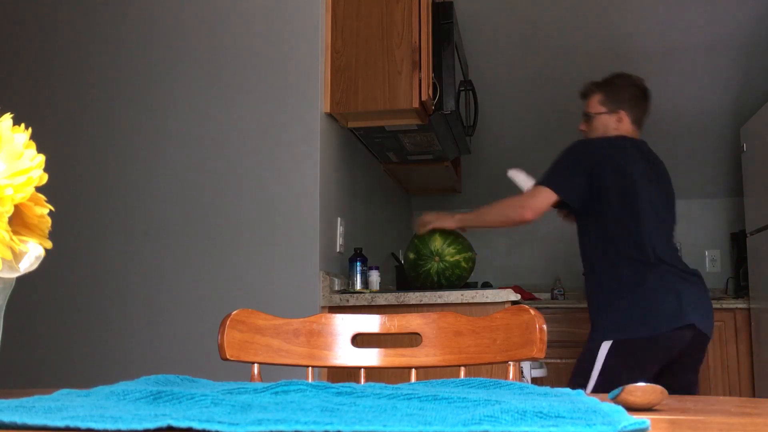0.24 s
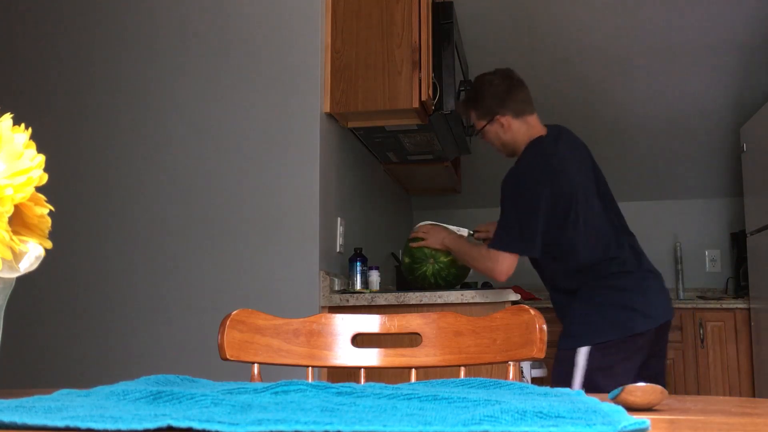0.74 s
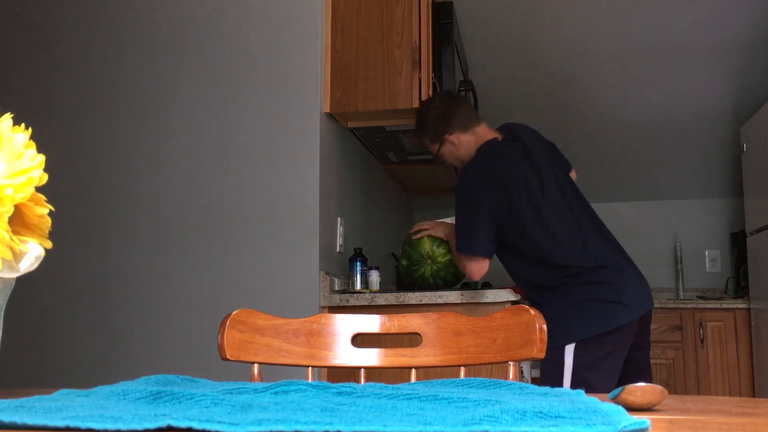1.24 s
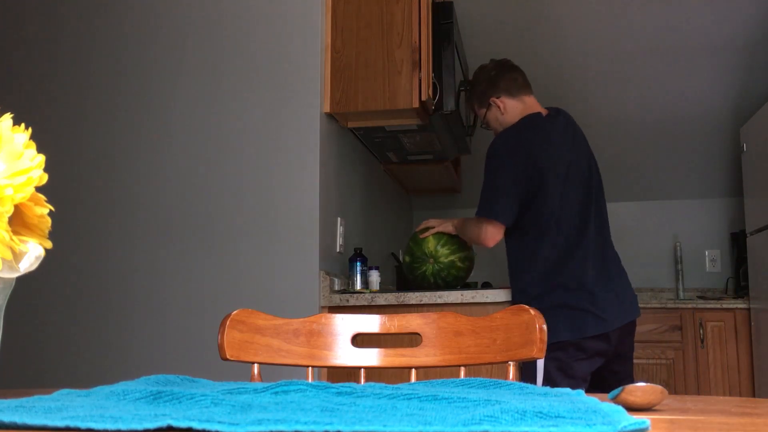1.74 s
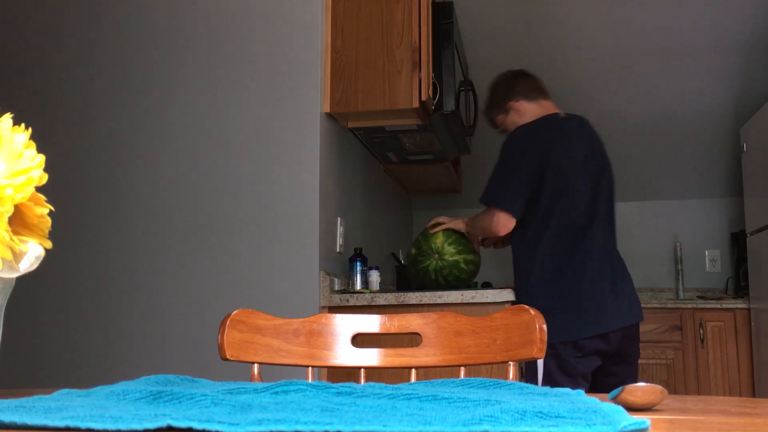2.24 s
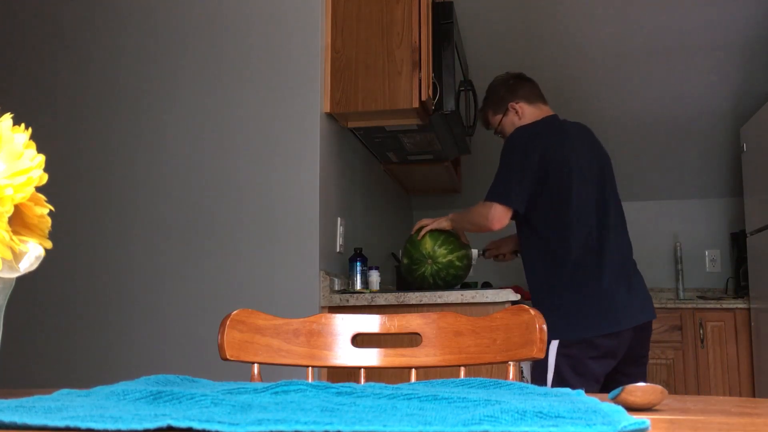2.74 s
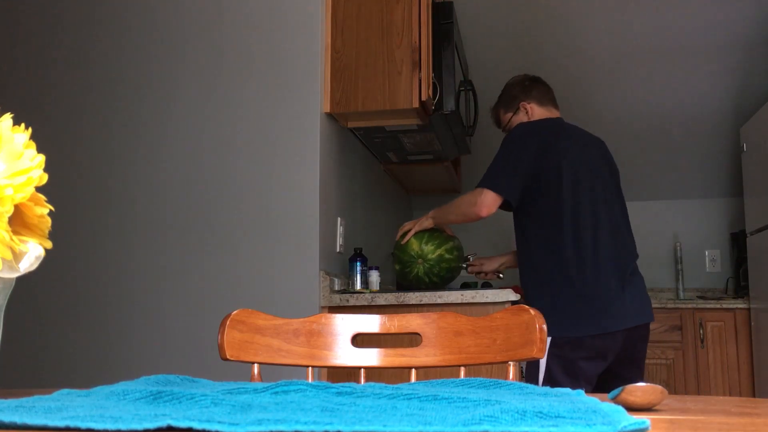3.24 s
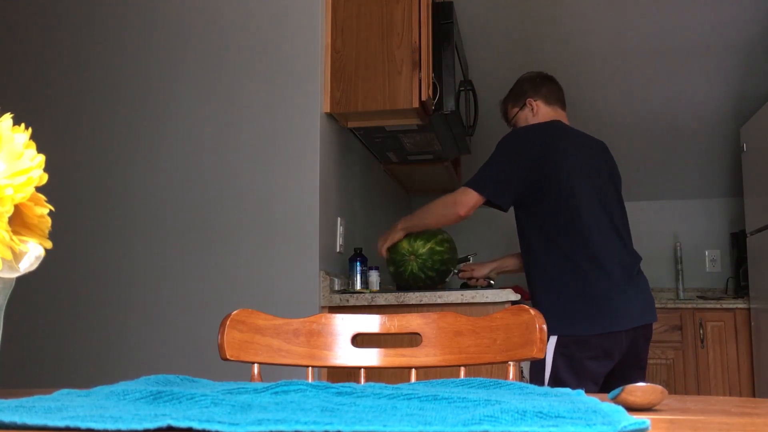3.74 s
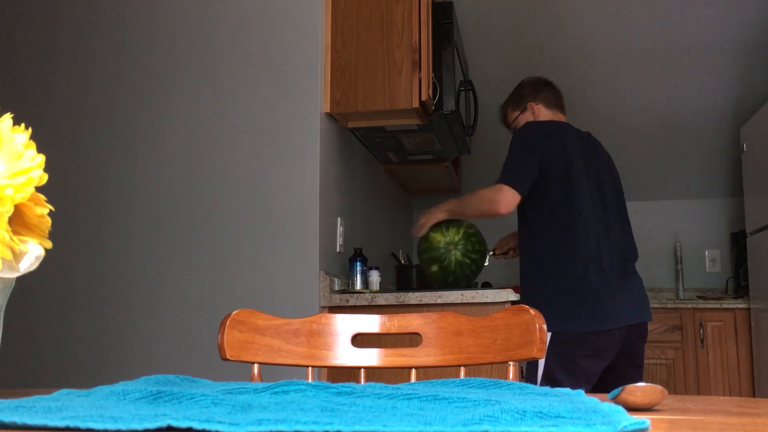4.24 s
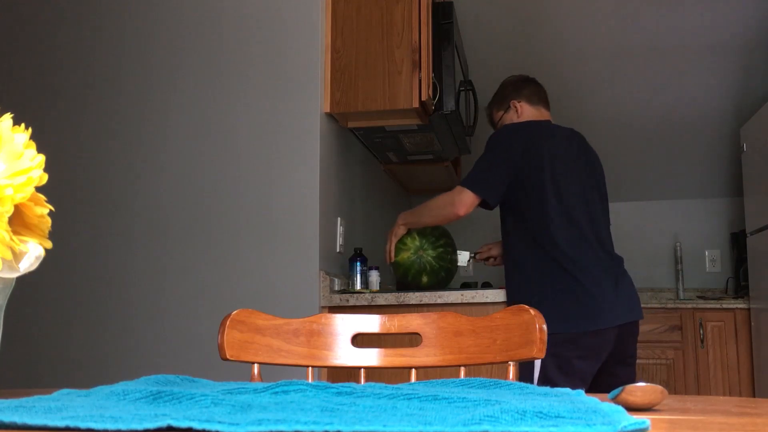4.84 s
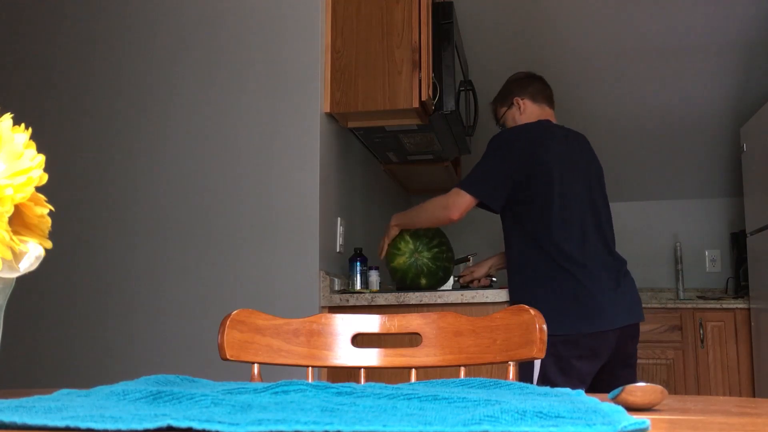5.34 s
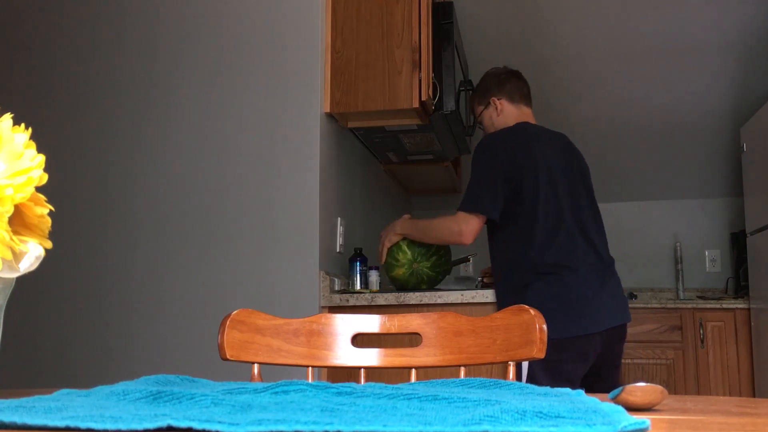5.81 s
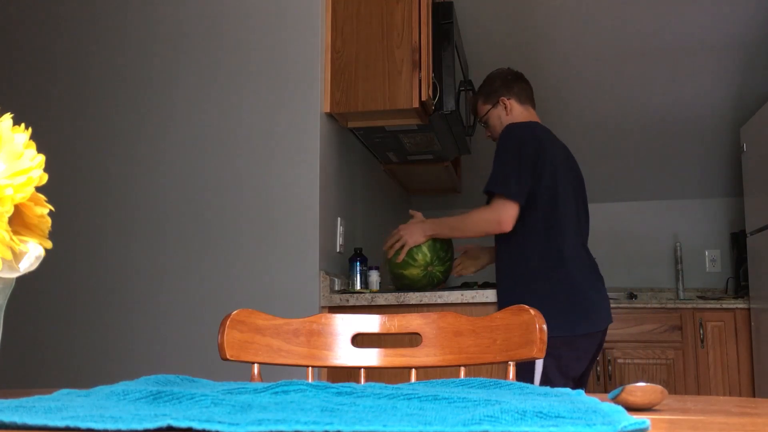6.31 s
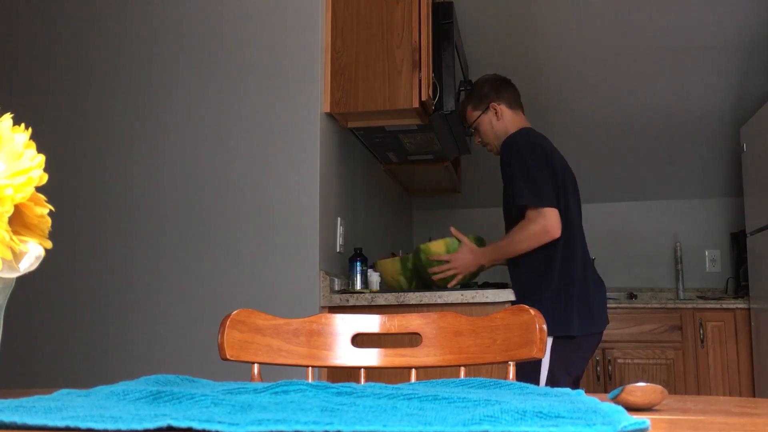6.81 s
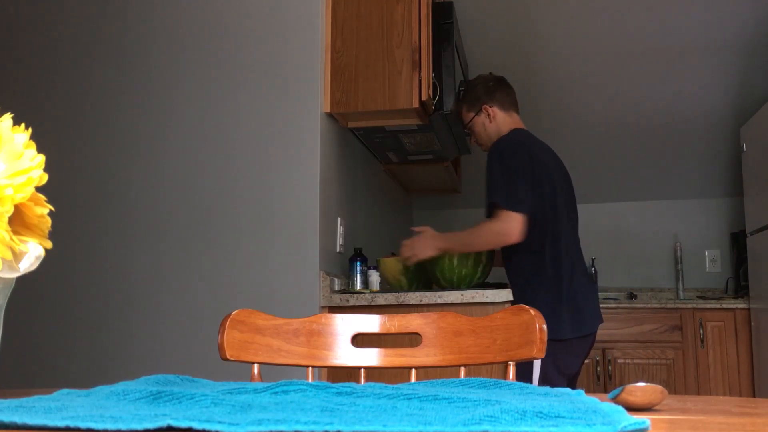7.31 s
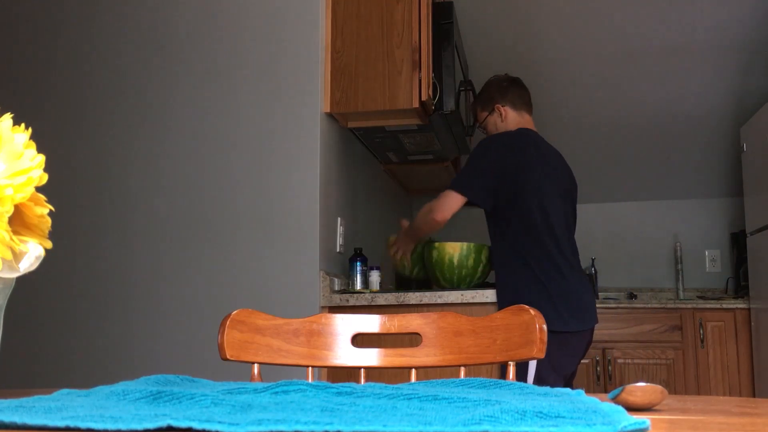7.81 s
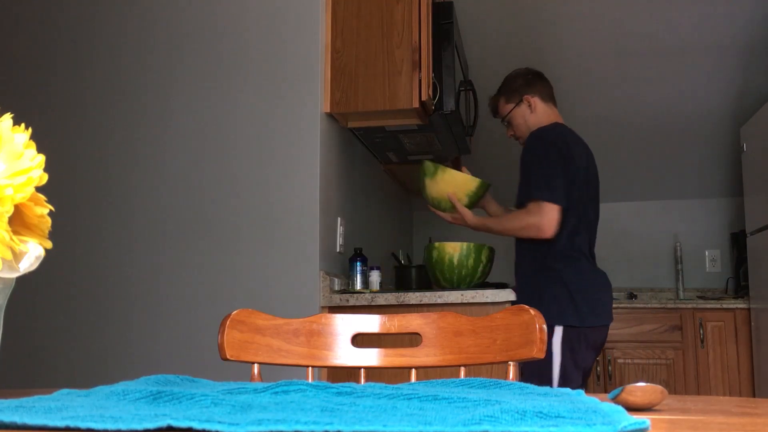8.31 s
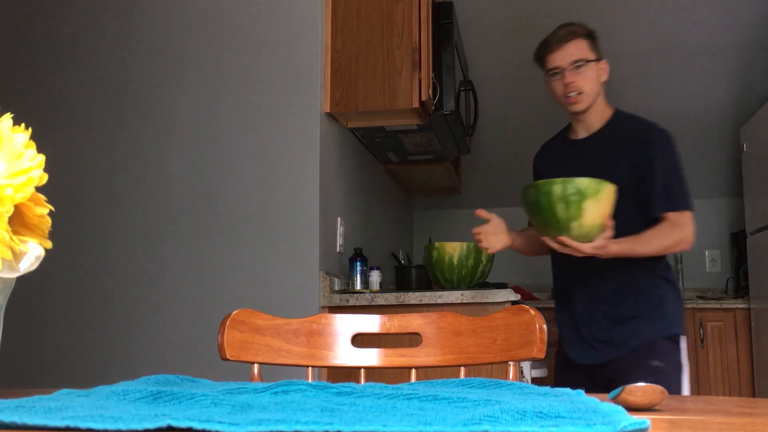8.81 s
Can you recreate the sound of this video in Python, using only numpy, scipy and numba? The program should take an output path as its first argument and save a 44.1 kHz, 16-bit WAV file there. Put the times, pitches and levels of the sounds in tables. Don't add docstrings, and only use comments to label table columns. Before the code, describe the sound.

A hard, echoing kitchen with a low, soft fridge hum, heard through a phone a few metres away. From 0 to 0.3 s, knife strokes crunch wet rind with three quick woody knocks and a little steel rattle; at 0.65 s a sharp slap and knock rings the counter. From 1 to 5 s it is much quieter: soft sawing and juicy rubbing, small creaks, dull weight shifts on the floorboards, light touches near 1.9 and 2.3 s, a dry snap at 3.2 s. At 5.2 s a loud slap and crack, another at 5.65, then the loudest burst from 5.8 to 6.2: tearing rind, heavy knocks, bright ringing blade chatter. It fades to soft drags. At 6.95 s a resonant clunk and scrape with a thin metallic shiver, then smaller bumps and rubs at 7.3, 7.5 and 7.8. Afterwards only hum, faint creaks and a dull footfall near 8.9.

```python
import sys
import numpy as np
from scipy import signal
from scipy.fft import rfft, irfft
from scipy.io import wavfile
from scipy.ndimage import uniform_filter1d
from numba import njit

SR = 44100
rng = np.random.default_rng(int(sys.argv[2]) if len(sys.argv) > 2 else 0)


def field_ratio(decibels):
    return 10 ** (np.asarray(decibels, dtype=float) / 20)


def int16_out(signal):
    q = np.round(np.clip(np.atleast_2d(signal).T, -1, 1) * 32767)
    wavfile.write(sys.argv[1], SR, q.astype(np.int16))


N = 399457
TIME = np.arange(N) / SR


def unit(x):
    return x / np.sqrt(np.mean(x ** 2))


def band(x, lo_hz, hi_hz, order=3):
    edges_hz = [lo_hz, min(hi_hz, 0.45 * SR)]
    return signal.sosfilt(signal.butter(order, edges_hz, "bandpass", fs=SR, output="sos"), x)


@njit
def svf(x, hz, width):
    y, b, l = np.empty(len(x)), 0., 0.
    for i in range(len(x)):
        g, k = np.tan(np.pi * hz[i] / SR), width / hz[i]
        v = (b + g * (x[i] - l)) / (1 + g * (g + k))
        b, l, y[i] = 2 * v - b, l + 2 * g * v, k * v
    return y


def resonance(x, hz, width_hz):
    return svf(x, np.full(len(x), 1. * hz), 1. * width_hz)


def walk(rate_hz):
    hold = int(SR / rate_hz)
    steps = np.repeat(rng.standard_normal(N // hold + 1), hold)
    slewed = uniform_filter1d(uniform_filter1d(steps, hold), hold)
    return np.clip(1.7 * slewed[:N], -2, 2)


def body(x, peaks, patchy_db=0):
    out = np.zeros(N)
    for k, (hz, width_hz, db) in enumerate(peaks):
        level_db = db + patchy_db * walk(14) if patchy_db else db
        out += (-1) ** k * field_ratio(level_db) * resonance(x, hz, width_hz)
    return out


def crunch(rate_hz, spread_db):
    clicks = (rng.random(N) < rate_hz / SR) * rng.standard_normal(N)
    return unit(clicks * field_ratio(spread_db * np.clip(rng.exponential(size=N), 0, 3)))


def effort(rows, rest_db):
    t = TIME[::64]
    power = field_ratio(2 * rest_db)
    for s, db, rise_s, fall_s in rows:
        slope_s = np.where(t < s, max(rise_s, 0.005), max(fall_s, 0.005))
        power = power + field_ratio(2 * (db - 20 * np.abs(t - s) / slope_s))
    return np.interp(TIME, t, 10 * np.log10(power))


def swells(table, sharpness, least_hz=1):
    out = np.zeros(N + SR)
    t = TIME[:SR // 2]
    for s, db, hz, length_s in table:
        shape = (1 - np.exp(-t / 0.0029)) * np.exp(-(t / max(length_s, 0.01)) ** 2)
        width_hz = max(hz / sharpness, least_hz)
        friction = rng.standard_normal(len(t)) * shape
        tone = resonance(resonance(friction, hz, width_hz), hz, width_hz)
        start = int(s * SR)
        out[start:start + len(t)] += field_ratio(db) * tone / np.abs(tone).max()
    return out[:N]


def rubbing():
    # t/s of most pressure, pressure/dB, rise/s, fall/s, wetness/dB
    sawing = [(0.0, -31, .05, 0.11, -15), (0.075, -31, .025, 0.26, -0.5), (0.12, -29.5, 0.1, 0.17, -20),
              (.19, -39.5, .2, 0.18, -11.5), (.25, -31.5, 0.033, 0.26, -2), (.41, -34.5, 0.27, 0.29, -9),
              (.52, -43.5, .1, 0.058, -11.5), (.655, -28, 0.011, 0.07, -6), (.73, -62.5, .05, 0.26, -7),
              (1.375, -43, 0.096, 0.18, -1), (1.87, -47.5, 0.028, 0.11, -34.5),
              (1.9, -53.5, 0.068, 0.18, -2.5), (1.2, -58, 0.18, 0.45, -9), (2.1, -57, 0.13, 0.2, -4.5),
              (2.338, -41, 0.045, 0.16, -9), (2.72, -45.5, 0.086, 0.13, 1), (3.83, -65.5, 0.12, 0.1, 6.5),
              (2.92, -59, 0.28, 0.99, 5.5), (3.22, -47, 0.34, 0.16, -4.5), (3.44, -54.5, 0.26, 0.12, 0),
              (3.66, -49, 0.096, 0.27, -2), (4.13, -52, 0.25, 0.59, -8.5), (4.55, -47.5, 0.087, 0.19, 4),
              (5.15, -42.5, .12, .06, -15.5), (4.78, -62, .12, 0.41, 2), (5.01, -59.5, 0.064, 0.37, 6.5),
              (5.08, -41.5, 0.13, 0.99, -10.5)]
    tearing = [(5.199, -59.5, .4, 0.065, -23.5), (5.219, -28, .04, 0.35, -12.5),
               (5.3, -34, 0.24, 0.18, -11.5), (5.36, -37, 0.12, 0.22, 7), (5.651, -24, 0.007, 0.11, -33),
               (5.7, -39.5, .06, .2, -19.5), (5.77, -21.5, 0.092, 0.05, -15),
               (5.83, -24.5, 0.065, 0.31, -16.5), (5.9, -21, 0.055, .22, -4),
               (6.059, -21.5, 0.3, 0.23, -1.5), (6.16, -23.5, .3, 0.23, -4.5), (6.27, -36.5, .3, 0.32, -24),
               (6.45, -45.5, 0.22, 0.76, -20), (6.75, -48.5, 0.016, 0.083, -16.5),
               (6.94, -32, 0.049, 0.16, -31.5), (6.99, -37.5, 0.069, 0.059, 3.5),
               (7.015, -28, 0.074, 0.085, -35), (7.22, -46, 0.16, 0.72, -27.5),
               (7.33, -39.5, 0.096, 0.13, -13), (7.52, -40, .1, 0.13, -9), (7.81, -40, 0.038, 0.13, -61),
               (8.23, -61.5, 0.064, 0.68, -8), (8.931, -60, 0.29, 0.11, -2)]
    # t/s of most weight, weight/dB, fall/s
    grinding = [(.07, -37, 0.15), (.25, -33, 0.13), (.4, -39.5, 0.28), (0.658, -33.5, 0.069),
                (1.01, -58, .15), (1.36, -49.5, 0.34), (2.34, -47, 0.18), (2.55, -45, 0.087),
                (3.23, -49, 0.46), (3.33, -46, 0.11), (3.66, -54, .3), (4.16, -55, 0.39), (4.538, -44, .15),
                (5.22, -42, 0.54), (5.67, -37, 0.093), (5.78, -36, 0.14), (5.899, -28.5, 0.14),
                (6.19, -37.5, 0.34), (6.89, -45, 0.39), (6.989, -27.5, .04), (7.55, -42.5, .2),
                (7.84, -58, .15)]
    # t/s, f/Hz
    cut = [(0, 1700), (.3, 1308), (.62, 1550), (1.9, 1470), (2.34, 970), (2.7, 1480), (3.25, 1200),
           (3.66, 1462), (4.16, 827), (4.54, 1450), (5.04, 1650), (5.35, 1100), (5.7, 960), (5.85, 1350),
           (6.16, 1585), (6.94, 1210), (7.5, 1000), (7.8, 738)]
    # f/Hz, width/Hz, level/dB
    counter_modes = [(650, 39, -2.5), (801, 17, 1), (1020, 49, -9), (1340, 23, 10), (1480, 37, -5.5),
                     (1752, 30, 3), (1830, 43, 3), (2168, 30, -8.5), (2420, 130, -2), (3516, 150, -6),
                     (3750, 65, -16.5), (4496, 67, -7.5), (5400, 160, -9), (6050, 100, -17.5)]
    # f/Hz, width/Hz, level/dB
    fruit_modes = [(146, 94, 4), (330, 57, 13.5), (400, 57, -3), (413, 31, -6), (650, 1100, -22)]
    rest_rind_db, rest_grind_db, rest_wet_db = -67, -59, -10
    edge_offset_db, edge_per_wet = -2.5, 0.38
    slack_hz, slack_db, loaded_db = 790, -65.5, -61.5

    rind_rows, edge_rows, juice_rows = [], [], []
    for s, db, rise_s, fall_s, wet_db in sawing + tearing:
        rind_rows.append((s, db, rise_s, fall_s))
        edge_rows.append((s, db + edge_offset_db + edge_per_wet * wet_db, rise_s, fall_s))
        juice_rows.append((s, db + wet_db, rise_s, 0.42 * fall_s))
    rind_db = effort(rind_rows, rest_rind_db)
    edge_db = effort(edge_rows, rest_rind_db + edge_offset_db + edge_per_wet * rest_wet_db)
    juice_db = effort(juice_rows, rest_rind_db + rest_wet_db)
    counter_db = effort([(s, db, 0.64 * fall_s, fall_s) for s, db, fall_s in grinding], rest_grind_db)

    load = np.clip((rind_db - slack_db) / (loaded_db - slack_db), 0, 1)
    cut_hz = slack_hz + load * (np.interp(TIME, *np.transpose(cut)) - slack_hz)
    flutter = field_ratio(1.2 * walk(25))
    grit = crunch(9000, 0.65) * flutter
    scrape = crunch(9000, 1.4) * flutter

    rind = unit(band(grit, 540, 1980, order=2))
    rind = rind + 0.45 * unit(body(grit, counter_modes[:8], patchy_db=5))
    rind = rind + 0.32 * unit(svf(grit, np.clip(cut_hz, 300, 4000), 370.0))

    edge = unit(band(band(scrape, 2200, 6600), 2100, 4300, order=1))
    edge = edge + 0.55 * unit(body(scrape, counter_modes[8:], patchy_db=5))

    spray = crunch(9900, 1.6) * field_ratio(1.2 * walk(11))
    fine = field_ratio(np.clip(-4.0 - 0.18 * (juice_db + 64.0), -16, -1.5))
    juice = band(spray, 5800, 10060) + fine * band(spray, 11000, 17000)

    counter = band(body(grit, fruit_modes), 99, 700)
    out = field_ratio(rind_db) * unit(rind) + field_ratio(edge_db) * unit(edge)
    return out + field_ratio(juice_db) * unit(juice) + field_ratio(counter_db) * unit(counter)


def rings():
    # t/s, peak/dB, f/Hz, length/s
    modes = [(0, -37, 1850, .05), (.066, -36, 1890, .04), (.066, -45, 4360, .02), (0.092, -42, 963, 0.047),
             (.13, -31.5, 1832, 0.052), (.13, -38, 3380, .04), (0.235, -38, 3750, .03),
             (0.237, -36, 1730, .05), (7.787, -44, 685, 0.078), (7.82, -45, 474, 0.058),
             (0.637, -32, 1553, 0.092), (0.644, -42, 3060, 0.054), (4.09, -50, 820, .13),
             (5.211, -27.5, 1340, 0.051), (5.207, -34, 2410, 0.051), (5.23, -35.5, 3470, .08),
             (5.22, -35, 842, 0.11), (5.65, -33, 1070, 0.11), (5.662, -41.5, 1830, 0.11),
             (5.745, -36, 3700, 0.06), (5.694, -38.5, 5230, 0.085), (5.741, -37.5, 6050, 0.07),
             (5.7, -44, 6750, .15), (5.809, -31, 3620, 0.057), (5.807, -31, 2070, 0.052),
             (5.805, -34, 4590, 0.034), (5.887, -29, 3400, 0.06), (5.888, -23, 1666, .08),
             (5.885, -28.5, 2420, .06), (5.887, -27.5, 5380, .08), (5.882, -27, 6880, 0.077),
             (6.002, -31, 5270, 0.048), (6.058, -28.5, 2400, .03), (6.11, -25, 1810, 0.047),
             (6.122, -35, 1070, .12), (6.24, -34.5, 2260, 0.1), (6.35, -45, 3530, 0.15),
             (6.92, -29, 1435, 0.092), (6.961, -40, 1020, 0.085), (6.967, -32, 1830, 0.07),
             (6.97, -35, 805, .08), (6.99, -41, 2400, 0.092), (7.198, -52, 1780, 0.16),
             (7.44, -45, 1720, 0.038), (7.496, -42, 1685, .05), (7.512, -45, 1237, 0.084),
             (6.05, -27, 3400, .05), (6.042, -36, 3740, .08), (5.7, -47, 7660, .1), (5.7, -45.5, 9390, .06)]
    split_hz = 2800
    low = swells([row for row in modes if row[2] < split_hz], sharpness=12.0)
    return low + swells([row for row in modes if row[2] >= split_hz], sharpness=24.0)


def fridge():
    # f/Hz, density/dB per Hz
    spectrum = [(25, -17.5), (40, 8), (60, 6), (85, -7), (125, -10.5), (220, -13), (400, -21.5),
                (600, -12.5), (1000, -14.5), (2000, -26.5), (3000, -52.5), (8000, -40), (12000, -40.5),
                (16000, -45.5)]
    # f/Hz, level/dB
    mains = [(59.2, -59)]
    # f/Hz, width/Hz, level/dB
    cabinet = [(152, 24, -65.5), (300, 55, -62.5), (356.5, 16, -63.5), (478, 35, -63.5), (670, 36, -71.5)]
    # t/s, depth/dB, length/s
    lull_s, lull_db, lull_length_s = (4.7, -13, 0.35)
    noise, swell_db = np.zeros(N), 0.22 * walk(0.24)
    hz_at, db_at = np.transpose(spectrum)
    for hz in 28 * 2 ** np.arange(0, 9.3, 1 / 3):
        density_db = np.interp(np.log(hz), np.log(hz_at), db_at)
        db = density_db + 10 * np.log10(hz) + swell_db + 3.7 * walk(8.2)
        noise += field_ratio(db) * unit(band(rng.standard_normal(N), hz / 1.104, hz * 1.154, order=2))
    floor = field_ratio(-58.5) * unit(noise)
    for hz, db in mains:
        floor += field_ratio(db + 3.5 + 1.4 * walk(4.8)) * np.sin(2 * np.pi * hz * TIME)
    panels = np.zeros(N)
    for hz, width_hz, db in cabinet:
        lo_hz, hi_hz = hz - width_hz / 2, hz + width_hz / 2
        panels += field_ratio(db) * unit(band(rng.standard_normal(N), lo_hz, hi_hz, order=1))
    ease = 1 - field_ratio(lull_db * np.exp(-((TIME - lull_s) / lull_length_s) ** 2))
    rumble = signal.sosfiltfilt(signal.butter(2, 100, fs=SR, output="sos"), floor)
    return floor - ease * rumble + panels


def knocks():
    # t/s, peak/dB, spot f/Hz, crack/dB, snap/dB
    blows = [(0.065, -18, 2080, -3, -29), (0.13, -20, 2080, -13, -33), (0.238, -20, 1950, 0, -18),
             (0.6356, -19.5, 1670, 3.5, -11), (1.866, -52, 1900, -10, -20), (2.321, -39, 800, -16, -6.5),
             (3.303, -39, 800, -18, -32), (4.243, -46.5, 510, 2, -9), (5.211, -18.5, 1604, -31, -33.5),
             (5.643, -20, 1280, -9, -36), (5.67, -23.5, 785, 4.5, -31), (5.809, -17, 1950, -22, -35.5),
             (5.878, -15, 2000, -7, -6), (5.898, -11, 1636, -6, -21.5), (6.037, -19, 1800, -12, -12.5),
             (6.064, -12, 2450, -14, -14), (6.119, -13, 1790, -3, -28), (6.738, -42, 1145, -12, -19),
             (6.919, -27, 1400, -8, -26), (6.959, -18.5, 1080, -28, -25), (7.27, -46, 630, 10.5, -13),
             (7.455, -40, 1790, -2, -18), (7.499, -34, 1624, -3, -27), (7.784, -34, 800, -14, -32)]
    contact_s, crack_s = 0.00093, 0.00045
    spot, crack, snap = np.zeros((3, N + SR))
    t = TIME[:SR // 8]
    for s, db, hz, crack_db, snap_db in blows:
        at = slice(int(s * SR), int(s * SR) + len(t))
        blow = rng.standard_normal(len(t)) * np.exp(-t / contact_s)
        blow[0] = 5.8
        own = band(blow * np.exp(-t / contact_s), 0.5 * hz, 1.5 * hz, order=2)
        spot[at] += field_ratio(db) * own / np.abs(own).max()
        crack[at] += field_ratio(db + crack_db) * blow * np.exp(-t / crack_s)
        snap[at] += field_ratio(db + snap_db) * blow
    cracks = field_ratio(-4.5) * band(crack[:N], 2300, 6000)
    return spot[:N] + cracks + field_ratio(-0.5) * band(snap[:N], 6000, 23000)


def feet():
    # t/s, peak/dB, floor f/Hz
    footfalls = [(0.067, -52, 40), (0.382, -44, 48), (0.665, -53, 40.7), (0.97, -52, 39.3),
                 (1.487, -48, 39.6), (2.345, -51, 55), (2.581, -57, 35.0), (3.177, -52, 44),
                 (3.837, -50.5, 34.8), (4.249, -58, 50), (4.518, -66, 43.1), (5.611, -42, 41.3),
                 (5.918, -44, 41.7), (6.919, -50, 48), (7.851, -57, 32.2), (8.859, -45, 43)]
    out = np.zeros(N)
    for s, db, hz in footfalls:
        t = np.clip(TIME - s, 0, None)
        out += field_ratio(db) * t / 0.015 * np.exp(1 - t / 0.024) * np.sin(2 * np.pi * hz * t)
    return out


def creaks():
    # t/s, peak/dB, f/Hz, length/s
    squeaks = [(.64, -35, 300, 0.026), (2.5, -45, 243, 0.079), (2.69, -45.5, 1600, 0.12),
               (3.3, -38.5, 330, 0.012), (3.63, -47, 1400, 0.13), (4.08, -48, 786, 0.16),
               (4.515, -45, 1730, .06), (4.52, -42, 1300, 0.083), (5.21, -47, 850, 0.11),
               (5.65, -36.5, 400, 0.023), (5.66, -29, 790, 0.34), (5.88, -25, 365, 0.033),
               (5.88, -29.5, 672, 0.28), (6.93, -29.5, 385, 0.031), (6.94, -30, 1050, 0.1),
               (6.94, -29.5, 1550, 0.096), (7.27, -42.5, 600, 0.12), (7.27, -45, 334, 0.1),
               (3.31, -54, 980, 0.096), (7.27, -43.5, 1620, 0.12), (7.47, -43, 624, 0.11),
               (7.5, -47, 1557, 0.078), (7.785, -42, 330, 0.061), (7.785, -40, 760, 0.087),
               (8.8, -56, 2370, 0.019), (8.22, -60.5, 2630, 0.048), (7.45, -48, 3900, 0.026),
               (7.505, -43, 3580, .04), (3.31, -52, 1300, .08), (.64, -34, 3630, 0.055),
               (.07, -34, 860, 0.07), (.245, -34, 810, 0.064), (.64, -35.5, 643, 0.025),
               (1.87, -52, 2120, 0.02)]
    return swells(squeaks, sharpness=4.7)


def blade():
    # t/s, level/dB, length/s
    chatter = [
        (0.084, -47, 0.096),
        (0.231, -33.5, 0.023),
        (5.881, -29, 0.091),
        (6.038, -20.5, 0.072),
        (6.122, -32, 0.033),
        (6.947, -41, 0.079),
    ]
    # f/Hz, width/Hz, level/dB
    steel_modes = [(3320, 120, -10), (3515, 60, -6), (3736, 60, -13), (3898, 63, -9), (4390, 62, -12),
                   (5170, 180, -9), (7080, 87, -11), (8040, 80, -20.5), (8400, 200, -15.5),
                   (8920, 380, -11.5), (9620, 220, -14)]
    drive = np.zeros(N)
    for s, db, length_s in chatter:
        drive += field_ratio(db) * (TIME > s) * np.exp(-((TIME - s) / length_s) ** 2)
    return field_ratio(17.0) * body(drive * crunch(1900, 1.7), steel_modes)


def thuds():
    # t/s, peak/dB, f/Hz
    rocks = [(0.104, -41, 170), (0.249, -43, 168), (0.406, -37.5, 139), (0.671, -35, 139), (1.383, -41, 86),
             (1.419, -51, 110), (2.356, -48, 75.4), (3.234, -46, 94.2), (4.285, -43.5, 137),
             (4.42, -59, 143), (5.238, -37.5, 134.7), (5.667, -48, 75), (5.86, -44, 102),
             (5.969, -35.5, 148.5), (6.149, -39, 130.5), (6.929, -40.5, 88), (7.156, -46, 113),
             (7.81, -40, 138)]
    return swells([(s, db, hz, 0.044) for s, db, hz in rocks], sharpness=1.3)


def slaps():
    # t/s, peak/dB, f/Hz, decay/s
    hits = [(.6356, -21, 2410, 0.0023), (0.6356, -30, 1800, .003), (.6356, -26, 3150, .002),
            (.6356, -28, 4000, .002), (.6356, -30, 650, .004), (5.21, -20.5, 1410, 0.0074),
            (5.212, -27.5, 3780, 0.0057), (5.212, -32.5, 4670, 0.0043), (5.645, -30, 1320, 0.0071),
            (5.809, -25.5, 2110, 0.0034), (2.321, -52, 1100, .006)]
    out = np.zeros(N)
    for s, db, hz, decay_s in hits:
        t = np.clip(TIME - s, 0, None)
        out += field_ratio(db) * np.exp(-t / max(decay_s, 0.001)) * np.sin(2 * np.pi * hz * t)
    return out


def tick():
    click = np.zeros(N)
    click[int(3.2138 * SR)] = field_ratio(-12)
    return band(click, 11500, 17500) + 0.1 * click


def tones():
    # t/s, peak/dB, f/Hz, length/s
    thin_modes = [(5.215, -31, 834, .05), (5.29, -38, 834, .07), (5.21, -33, 1330, .05),
                  (5.25, -38, 1300, .08), (5.22, -37, 2440, .07), (5.23, -42, 1900, .08),
                  (6.93, -29, 1023, .1), (6.915, -32, 1448, .07), (6.96, -36, 1900, .05),
                  (7.0, -38, 1814, .05), (6.94, -34, 382, .07), (7.275, -45, 334, .06),
                  (7.45, -47, 334, .1), (7.3, -48, 635, .05), (7.49, -48, 635, .08), (7.29, -47, 947, .07),
                  (7.5, -52, 1238, .07), (7.27, -52, 1700, .1), (7.49, -50, 1669, .07),
                  (7.29, -58, 5432, .3), (7.825, -45, 334, .04), (5.885, -23, 3380, .1),
                  (6.035, -22, 3515, .11), (6.08, -31, 3736, .08), (6.035, -29, 3898, .12),
                  (5.89, -31, 5380, .09), (6.05, -32, 5335, .07), (6.09, -34, 5060, .07),
                  (5.8, -36, 3900, .05), (.645, -40, 4600, .06), (6.06, -26, 3380, .04),
                  (5.65, -38, 5430, .06)]
    return swells(thin_modes, sharpness=100.0, least_hz=32.0)


def shivers():
    # t/s, peak/dB, f/Hz, length/s
    quivers = [
        (6.96, -45.5, 4430, 0.11),
        (6.97, -55, 5150, 0.093),
        (7.265, -54, 5400, 0.087),
        (7.3, -57, 5330, .07),
        (7.43, -57, 5400, 0.12),
        (7.45, -56, 6110, 0.11),
        (7.58, -61, 5330, 0.093),
    ]
    return swells(quivers, sharpness=32.0)


def kitchen(x, wet_db, echo):
    # f/Hz, t60/s
    decays = [(120, 0.67), (400, 1), (1200, 0.45), (3500, 0.74), (8000, 0.52), (14000, 0.41)]
    t = TIME[:SR]
    tail = np.zeros(SR)
    for hz, t60_s in decays:
        tail += band(echo, hz / 2, hz * 2, order=1) * field_ratio(-60 * t / t60_s)
    tail *= 1 - np.exp(-(t / 0.0011) ** 2)
    tail /= np.sqrt(np.sum(tail ** 2))
    return x + field_ratio(wet_db) * signal.fftconvolve(x, tail)[:N]


def scene():
    echo = rng.standard_normal(SR)
    soft = rings() + creaks() + blade() + thuds() + tick() + shivers()
    mono = field_ratio(-7.0) * kitchen(rubbing(), -2.96, echo) + fridge()
    mono += field_ratio(-1.0) * kitchen(knocks(), 10.53, echo) + feet()
    mono += field_ratio(-0.5) * kitchen(soft, -0.43, echo)
    mono += kitchen(slaps(), -4.5, echo) + kitchen(tones(), -9.5, echo)
    return np.array([mono, mono])


def starve(x):
    # t/s, depth/dB, length/s
    gaps = [(0.488, -18, 0.023), (1.34, -15, 0.01), (1.682, -18, 0.015), (1.874, -14, 0.009),
            (2.066, -10, 0.009), (2.131, -18, 0.022), (2.3, -14, 0.009), (3.689, -18, 0.019),
            (4.285, -18, 0.02), (4.627, -17, 0.013), (5.67, -30, 0.017), (6.419, -15, 0.013),
            (6.547, -16, 0.015), (6.761, -13, 0.016), (6.887, -15, 0.022), (7.017, -16, 0.016),
            (7.645, -6, 0.008),
            (.745, -14, .013),
        (1.14, -40, .026),
        (3.41, -15, .015),
    ]
    bass = signal.sosfiltfilt(signal.butter(4, 1200, fs=SR, output="sos"), x)
    treble, lines, size = x - bass, np.zeros(N), 1024
    index = np.arange(size // 2 + 1)
    dip_db = np.zeros(N)
    for s, db, length_s in gaps:
        at = slice(int(s * SR) - size // 2, int(s * SR) + size // 2)
        bins = rfft(treble[at] * np.hanning(size))
        strongest = np.abs(bins[:-1]).reshape(-1, 16).max(axis=1)
        tops = np.abs(bins) >= 0.8 * np.repeat(strongest, 16)[index - 1]
        lines[at] += irfft(bins * tops * (index < 144))
        dip_db += db * np.exp(-((TIME - s) / (0.43 * length_s)) ** 4)
    dip = field_ratio(dip_db)
    return bass + dip * treble + 1.9 * (1 - dip) * lines


def roll_off(x):
    return signal.sosfilt(signal.butter(12, 16670, fs=SR, output="sos"), x)


def record(dry):
    mono = dry[0] - 0.32 * resonance(dry[0], 10600, 690) - 0.27 * resonance(dry[0], 2850, 420)
    mono = signal.sosfilt(signal.butter(2, 30, "highpass", fs=SR, output="sos"), mono)
    mono = signal.sosfilt(signal.ellip(10, 0.2, 60, 15800, fs=SR, output="sos"), starve(mono))
    below = signal.sosfiltfilt(signal.butter(8, 15200, fs=SR, output="sos"), mono)
    busy = np.clip(uniform_filter1d(np.abs(mono), size=4096) / field_ratio(-38), 0, 1) ** 3
    mono = mono - np.sqrt(busy) * (mono - below)
    return roll_off(np.array([mono, mono]))


dry = scene()
out = record(dry)
int16_out(out)
```